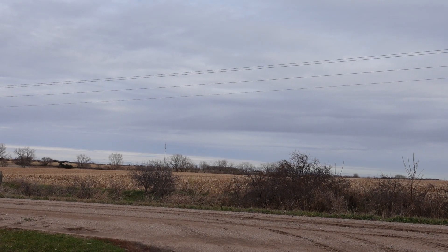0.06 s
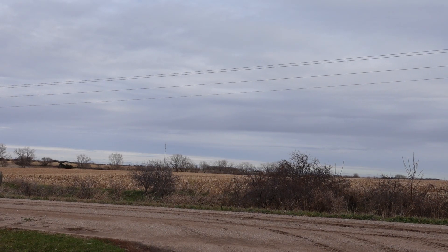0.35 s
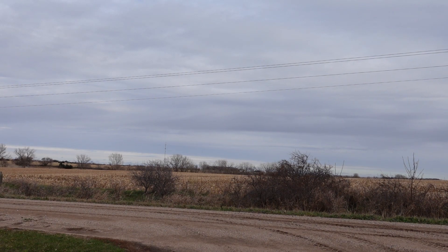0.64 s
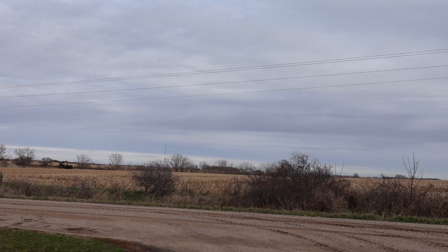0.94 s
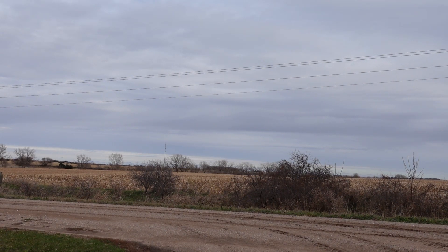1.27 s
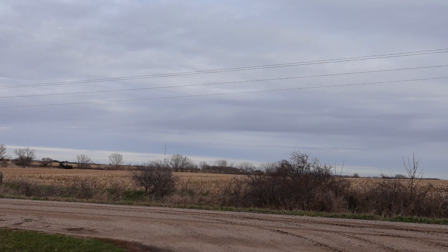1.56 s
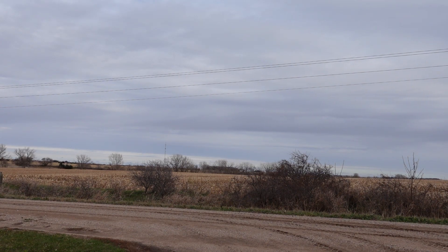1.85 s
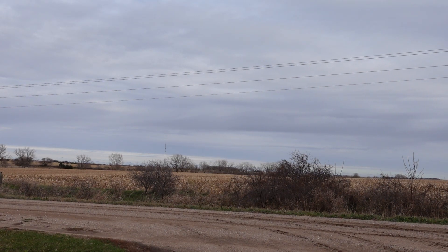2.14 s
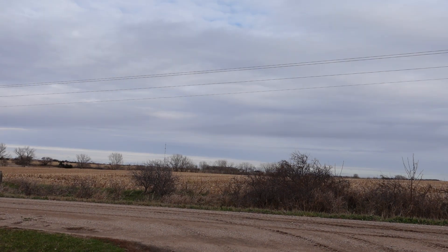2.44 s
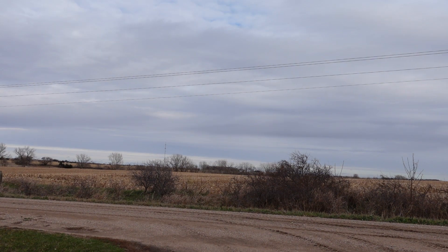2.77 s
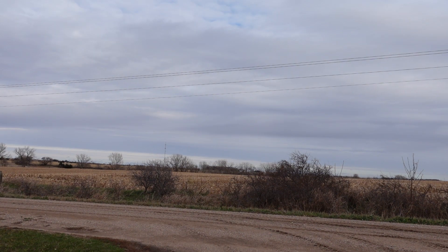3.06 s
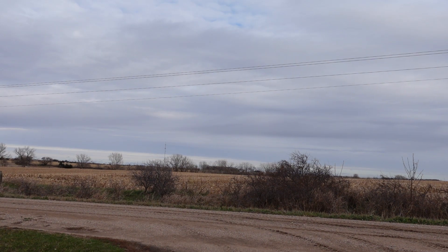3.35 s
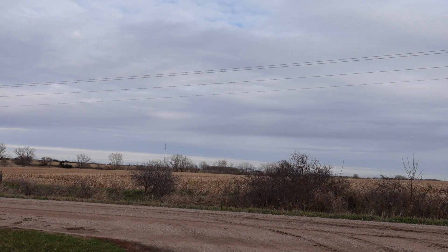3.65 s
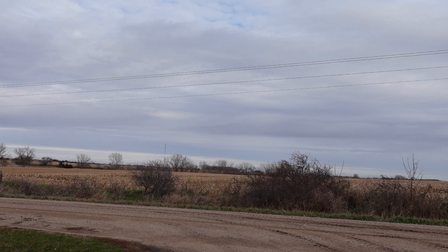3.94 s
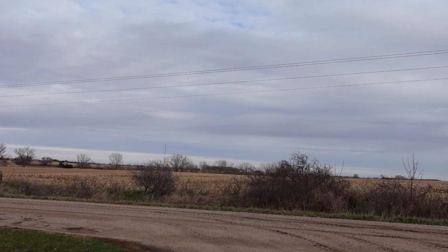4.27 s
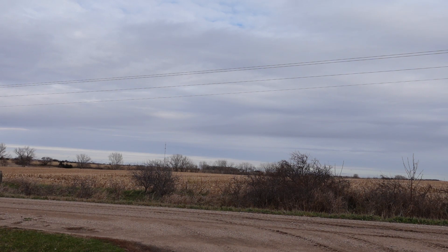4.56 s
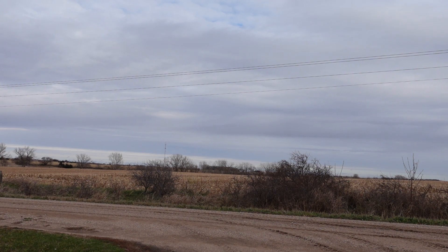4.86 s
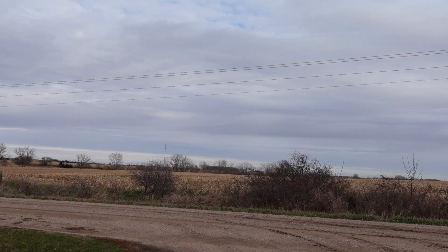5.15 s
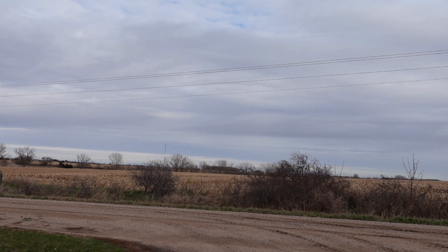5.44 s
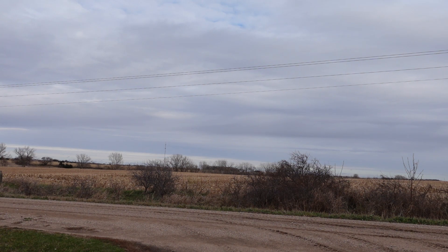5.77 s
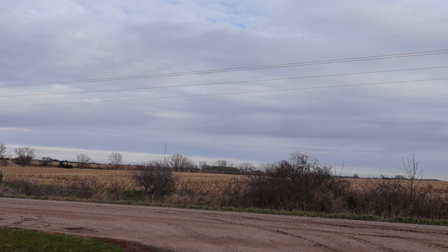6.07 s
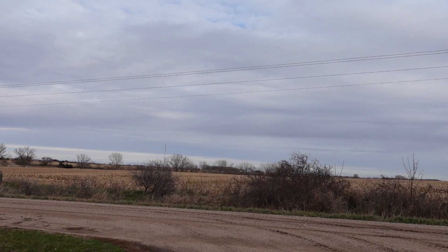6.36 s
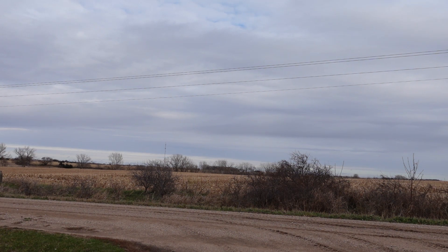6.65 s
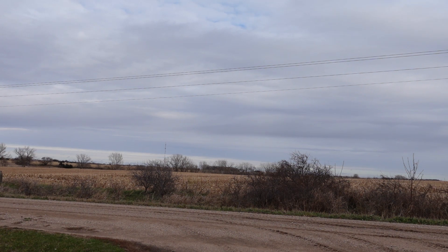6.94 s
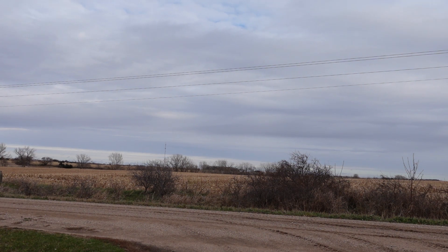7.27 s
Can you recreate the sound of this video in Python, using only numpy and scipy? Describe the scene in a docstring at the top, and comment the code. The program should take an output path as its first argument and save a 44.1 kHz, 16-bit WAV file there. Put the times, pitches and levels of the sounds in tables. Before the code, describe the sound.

A turbo-diesel truck's harsh, chopping exhaust recedes on the right, then suddenly drones far off on the left and grows nearer.

```python
"""A hard, chopping diesel rasp, close on the right: a straight-piped six-cylinder turbo truck pulls away
on a gravel road in open fields, shifts up and lifts off. Then, abruptly, it is a far drone coming
nearer, shifting up once more. Each firing gives a low pipe pulse and a rasping puff of gas;
an echo off the road sweeps through the rasp. Faint hiss lies underneath."""
import sys
import numpy as np
from scipy import signal
from scipy.fft import rfft, irfft
from scipy.io import wavfile
from scipy.ndimage import uniform_filter1d, minimum_filter1d

SR = 44100
rng = np.random.default_rng(int(sys.argv[2]) if len(sys.argv) > 2 else 0)


def unload_wav(signal):
    """Save mono or channel-first audio to the path in sys.argv[1] as 16-bit WAV at rate SR, clipped to [-1, 1]."""
    wavfile.write(
        sys.argv[1],
        SR,
        np.round(np.clip(np.atleast_2d(signal).T, -1, 1) * 32767).astype(np.int16),
    )


N = 331191
TIME = np.arange(N) / SR
WINDOW = dict(nperseg=1024, noverlap=768)
BIN_HZ, FRAME_S, _ = signal.stft(TIME, SR, **WINDOW)

# Leaving, the revs sink into the higher gear. Each row: time in seconds, crank turns a second.
AWAY_REVS = [(0, 32.7), (.31, 32.9), (.6, 30.5), (.84, 28.5), (1.02, 25.6), (1.3, 25.85), (2.18, 26.2),
             (2.33, 24), (2.42, 23)]


def truck_away():
    """Close by, tailpipe toward the listener: a hard, chopping rasp over the drone and the pipe's ring."""
    # Pipe overtones. Each row: multiple of the crank speed, then relative dB at each stage.
    orders = [(4, -10, -24, -21), (5, -30, -12, -17.5), (7, -9.5, -11.5, -18.5), (8, -4.5, -17.5, -14),
              (9, -5, -9, -2.5), (10, -2.5, -11, -14.5), (11, -16, -7.5, -13), (12, -24, -7, -14.5),
              (13, -13.5, -10.5, -9), (14, -32, -19, -19.5), (15, -39, -31, -18.5), (16, -28, -16, -14),
              (18, -36, -34, -23)]
    stages_s = (0.25, 0.92, 1.13)  # pulling, shifting, in the higher gear
    # Tone of the rasp. Each row: frequency in Hz, relative level in dB.
    colour = [(80, -57), (300, -22), (520, -14), (750, -8.5), (1100, -3.5), (1450, 1), (2100, -3),
              (3000, -9.5), (4000, -11.5), (5200, -18), (6500, -24.5), (8500, -30.5), (9700, -41.5),
              (13000, -70.5)]
    # Bounce off the road. Each row: time in seconds, delay in ms, signed strength.
    echo = [(0, 0.52, .07), (.75, .55, 0.14), (1.5, 0.48, 0.27), (2.43, 0.32, .2)]
    # Gliding bands of rasp swell or sink. Each row: peak time and half length in seconds,
    # centre in Hz, glide in octaves a second, relative lift in dB.
    sweeps = [(0.09, 0.29, 1350, .4, 1), (0.096, .5, 2790, 0.064, -6), (0.097, 0.35, 800, 0, 3),
              (.65, 0.2, 1920, .3, 2.5), (1.15, .38, 3060, 0.27, -8.5), (1.446, 0.26, 2472, 0.0095, 3.5),
              (1.6, 0.58, 700, 0.12, -2.5), (1.9, 0.42, 4100, .3, -0.5)]
    # Stereo image. Each row: frequency in Hz, left minus right in dB, left lead in radians, coherence.
    image = [(100, 0, 0, 1), (200, -1, 0, 1), (320, -2.5, 0, .995), (560, -7.5, .05, .88),
             (1200, -12, .7, .88), (2100, -12.5, 0, .91), (3100, -12, -1.2, .9), (4600, -10, -1.9, .89),
             (7000, -9, -2.5, .86), (8600, -9, -1.6, .85)]
    turns = crank(AWAY_REVS, jitter_turns=0.0057)
    low = drone(turns, away_levels, orders, stages_s, waver_db=1.2, rumble_db=-8.5)
    gas = puffs(turns, depth_db=8.0, uneven_db=2.0)
    high = rasp(gas, away_levels, colour, echo, sweeps, image, shimmer_db=1.56)
    return pan_low(low + pipe_ring(away_levels), image) + high


def truck_toward():
    """Far off and nearing: the drone carries, and the rasp grows out of it."""
    # The revs climb, drop at the shift and climb again. Each row: time in seconds, turns a second.
    revs = [(2.44, 29.44), (2.85, 32), (3.3, 34.36), (3.41, 35.35), (3.7, 30.34), (4.4, 30.95), (7.5, 34.8)]
    # Overtones, rasp tone, road bounce, gliding bands and stereo image; columns as in truck_away.
    orders = [(4, -14, -10, -11, -8.5), (5, -12, -17, -18, -15), (7, -20, -6, -7, -7),
              (8, -10, -8.5, -12.5, -3.5), (9, -4, -18, -5.5, -10), (10, -15.5, -10, -20, -19.5),
              (11, -20.5, -18.5, -12.5, -18), (12, -26, -17, -13.5, -29), (13, -18.5, -27, -14, -16),
              (14, -23, -18, -24, -17), (15, -28, -21, -25, -36), (16, -27, -20.5, -25.5, -29)]
    colour = [(80, -34), (300, -17), (520, -8.5), (750, -1.5), (1000, -0.5), (1350, 0.5), (1900, -1),
              (2800, 2.5), (3900, 3.5), (4700, -4.5), (5500, -15.5), (6500, -28), (8000, -44), (10000, -63)]
    echo = [(2.43, 0.83, -0.023), (4.1, 0.87, -0.21), (4.6, 0.61, -0.23), (5.1, 0.6, -0.33),
            (5.5, 0.46, -0.18), (6.0, 0.4, -0.33), (6.4, 0.37, 0.13)]
    sweeps = [(2.85, .22, 4850, -.2, 6), (3.15, 0.37, 2600, -0.16, 8.5), (3.3, 0.36, 1190, -.3, 8.5),
              (3.5, 0.37, 4240, -.15, -8.5), (3.9, .25, 3400, 0.9, 7.5), (4.55, 0.55, 870, .12, 6.5),
              (4.6, .5, 4850, 0.09, 13), (5.0, 0.27, 3483, 0.7, -5), (5.5, 0.39, 3300, 0.3, 5.5),
              (5.9, 0.6, 1360, 0.1, 4), (6.8, .7, 920, 0, -6), (7.1, .7, 1709, 0.3, 3.5)]
    image = [(170, 0, 0, 1), (320, 1, 0, .995), (560, 4.5, -.1, .88), (1000, 8, -.15, .92),
             (2200, 8.3, -.08, .97), (4500, 6.8, -.15, .97), (7000, 4.5, -.2, .75)]
    stages_s = (3.348, 3.878, 5.9, 7)  # revving, in the higher gear, nearing, near
    turns = crank(revs, jitter_turns=0.0023)
    low = drone(turns, toward_levels, orders, stages_s, waver_db=2.0, rumble_db=-8)
    gas = puffs(turns, depth_db=7.5, uneven_db=0.0)
    high = rasp(gas, toward_levels, colour, echo, sweeps, image, shimmer_db=1.0)
    return pan_low(low, image) + high


def away_levels(t):
    """Layer levels in dB: the truck recedes, booms, surges and drops away as the driver lifts off."""
    # Layers: firing note, octave, overtones, rasp, bright edge, fizz. Each row: opening dB, fade in dB
    # a second, share of the surges, lift-off start and length in seconds, lift-off drop in dB.
    layers = [(-35, -0.5, 0, 2.2, .13, 13), (-32, 1, 0, 2.18, 0.22, 10.5),
              (-28.5, 1.47, 0, 2.203, 0.09, 12.4), (-20, 4.5, 0.45, 2.147, 0.21, 13.8),
              (-31, 1.15, 1.2, 2.107, 0.29, 18), (-37.5, 8, 1.3, 2.18, 0.18, 7.9)]
    # Surges and lulls of the rasp. Each row: peak time and half length in seconds, dB at full share.
    surges = [(.27, .06, 1.0), (.55, 0.097, 2.5), (.92, 0.031, 2), (1.13, 0.12, -1.5), (1.32, .06, 1),
              (1.48, .06, -2.2), (1.67, 0.047, -4), (1.79, 0.092, 3), (2.08, 0.051, 4)]
    surge_db = swells(surges, t)
    note, octave, *rest = [db - fade * t + share * surge_db - drop * np.clip((t - off_s) / length, 0, 1)
                           for db, fade, share, off_s, length, drop in layers]
    note_hz = 3 * follow(AWAY_REVS, t)[0]
    boom_db = 8 * bell(note_hz, centre=86.2, width=5.9)  # the note sinks through a pipe resonance
    off_resonance_db = 11 * (1 - bell(2 * note_hz, centre=152.3, width=23))  # the octave has its own
    return [note + boom_db, octave - off_resonance_db, *rest]


def toward_levels(t):
    """Layer levels in dB: they grow as the truck nears and dip as the throttle closes for the shift."""
    # Drone loudness. Each row: time in seconds, then firing note, octave and overtones in dB.
    drone_levels = [(2.44, -46.5, -42, -45.5), (3.2, -41, -38, -45), (3.56, -38.5, -39.5, -43.5),
                    (3.7, -42.5, -46.5, -42.5), (4.6, -39.5, -43.5, -44.5), (6.15, -36, -39, -41),
                    (6.95, -41, -47, -42.5), (7.5, -40, -47, -44)]
    # Rasp loudness. Each row: time in seconds, then rasp, bright edge and fizz in dB.
    rasp_levels = [(2.44, -58.5, -63, -81), (3.3, -52.5, -54.5, -75.5), (3.9, -52.5, -49.5, -75),
                   (4.75, -49, -52, -66.5), (6.1, -42, -43, -67.5), (6.4, -41.5, -39.5, -60.5),
                   (6.7, -41, -37, -49.5), (6.97, -41, -37.5, -56.5), (7.5, -41, -39, -58)]
    # Dip at the shift in dB, one for each of those six layers.
    dips_db = [6.5, 9, 1.5, 1.9, 4.4, 6]
    # The far note swells and fades. Each row: peak time and half length in seconds, lift in dB.
    note_swells = [(2.55, .05, 3), (2.78, .05, 3.5), (2.9, .05, -5), (4.05, 0.14, 4), (5.9, .15, -2),
                   (7.2, 0.11, -2.5)]
    shifting = bell(t, centre=3.425, width=0.069)
    layers = follow(drone_levels, t) + follow(rasp_levels, t)
    note, *rest = [db - dip * shifting for db, dip in zip(layers, dips_db)]
    return [note + swells(note_swells, t), *rest]


def crank(revs, jitter_turns):
    """Running count of crankshaft turns, slightly unsteady."""
    return np.cumsum(follow(revs, TIME)[0]) / SR + jitter_turns * wander(rate_hz=44) + 1


def puffs(turns, depth_db, uneven_db):
    """Two streams of gas noise burst at each firing, each cylinder with its own strength."""
    # Extra punch of the six cylinders in dB, in firing order.
    cylinders_db = [-1.4, 0.95, 0.36, -1.6, 0.66, 0.019]
    firings = 3 * turns + .25
    burst = np.interp(firings % 1, [0, .15, .35, 1], [0.12, 1, 0.95, 0.051])  # snap, hold, slower fall
    strength_db = np.resize(cylinders_db, 1024) + uneven_db * rng.uniform(-1, 1, 1024)
    chop = gain_of(burst * (depth_db + strength_db[firings.astype(int)]))
    return unit_rms(chop * rng.standard_normal((2, N)))


def rasp(gas, levels, colour, echo, sweeps, image, shimmer_db):
    """The puffs take the tailpipe's colour, the road's echo and the shimmer of moving air."""
    hz = BIN_HZ[:, None]
    delay_ms, strength = follow(echo, FRAME_S)
    road_comb = abs(1 + strength * np.exp(-2j * np.pi * hz * delay_ms / 1000))
    shape = gain_of(spectrum_at(colour, hz)[0]) * road_comb
    for peak_s, half_s, middle_hz, glide, lift_db in sweeps:
        centre_hz = middle_hz * 2 ** (glide * (FRAME_S - peak_s))
        band = bell(hz, centre_hz, 100 + 0.083 * centre_hz)
        shape *= gain_of(lift_db * bell(FRAME_S, peak_s, half_s) * band)
    shape = ride_bands(shape, levels(FRAME_S)[-3:])
    shape *= gain_of(shimmer_db * patches(shape.shape, bins=16, frames=14))
    shape *= gain_of(1.5 * patches(shape.shape, bins=3, frames=40))  # fine ripple of scattered paths
    return spread_gas(gas, shape, image)


def ride_bands(shape, levels_db):
    """Brings rasp, bright edge and fizz to the levels that load and distance set."""
    bands_hz, centres_hz = [(600, 2400), (2400, 5000), (5000, 9000)], [1600, 3500, 5400]
    shares = [np.interp(np.log(BIN_HZ[:, None] + 1), np.log(centres_hz), row) for row in np.eye(3)]
    for _ in range(2):  # the lifts overlap, so a second pass settles them
        powers = [np.sum(shape[(BIN_HZ >= lo) & (BIN_HZ < hi)] ** 2, axis=0) / len(BIN_HZ)
                  for lo, hi in bands_hz]
        lifts_db = [db - 10 * np.log10(power) for db, power in zip(levels_db, powers)]
        shape = shape * gain_of(sum(share * lift for share, lift in zip(shares, lifts_db)))
    return shape


def spread_gas(gas, shape, image):
    """Filters the gas by a moving spectral shape and spreads it, partly coherent, to left and right."""
    right, loose = signal.stft(gas, SR, **WINDOW)[2]
    balance_db, lead, coherence = spectrum_at(image, BIN_HZ[:, None])
    coherence, tilt = np.clip(coherence, 0, 1), gain_of(balance_db)
    left = tilt * np.exp(1j * lead) * (coherence * right + np.sqrt(1 - coherence ** 2) * loose)
    mid_gain = np.sqrt(1 + tilt ** 2 + 2 * tilt * coherence * np.cos(lead)) / 2
    return signal.istft(np.array([left, right]) * shape / mid_gain, SR, **WINDOW)[1][:, :N]


def drone(turns, levels, orders, stages_s, waver_db, rumble_db):
    """Three firings a turn make the note and its octave; unequal cylinders fill in the other orders."""
    # Gas rumble between the overtones, with the pipe's boom. Each row: frequency in Hz, relative dB.
    rumble_colour = [(20, -25.5), (45, -16.5), (65, -4.5), (105, -3), (126, -7.5), (136, 9.5), (148, 0),
                     (180, 1.5), (260, 4), (400, -7), (600, -11.5), (1000, -60.5)]
    note_db, octave_db, overtone_db, *_ = levels(TIME)
    overtones = np.zeros(N)
    for order, *stage_db in orders:
        # multiples of the firing rate line up into one pulse, the others fall anywhere
        lag = rng.random() * (order % 3 > 0)
        strength_db = np.interp(TIME, stages_s, stage_db) + waver_db * wander(rate_hz=5)
        overtones -= gain_of(strength_db) * np.cos(2 * np.pi * (order * turns + lag))
    note_db += .7 * wander(rate_hz=11)  # moving air
    octave_db += 1.2 * wander(rate_hz=9)
    firing_phase = 6 * np.pi * turns
    note = -gain_of(note_db) * np.cos(firing_phase) - gain_of(octave_db) * np.sin(2 * firing_phase)
    throb = gain_of(.5 * wander(rate_hz=27))  # combustion varies from cycle to cycle
    rumble = gain_of(rumble_db) * noise(rumble_colour)
    return throb * (np.sqrt(2) * note + gain_of(overtone_db) * (np.sqrt(2) * overtones + rumble))


def pipe_ring(levels, pitch_hz=136.3, below_octave_db=6):
    """The pipe rings at its own pitch whatever the engine speed, and beats against the octave."""
    _, octave_db, *_ = levels(TIME)
    cycles = pitch_hz * TIME + 0.24 * wander(rate_hz=8)
    ring_db = octave_db - below_octave_db + 2.1 * wander(rate_hz=6.7)
    return np.sqrt(2) * gain_of(ring_db) * np.sin(2 * np.pi * cycles)


def pan_low(x, image):
    """Low sound reaches both sides in step, a little louder on the near one."""
    tilt = gain_of(spectrum_at(image, np.fft.rfftfreq(N, 1 / SR))[0])
    return irfft(rfft(x) * 2 * np.array([tilt, np.ones_like(tilt)]) / (1 + tilt), N)


def hiss(level_db=-76.5):
    """Faint, soft microphone hiss, mostly in the centre."""
    # Tone of the hiss. Each row: frequency in Hz, relative level in dB.
    colour = [(100, 0), (1000, -2), (6000, -7), (10000, -9.5), (15500, -10)]
    return gain_of(level_db) * (noise(colour) + 0.31 * np.array([noise(colour), noise(colour)]))


def gain_of(db):
    """Decibels to gain."""
    return 10 ** (np.asarray(db) / 20)


def unit_rms(x):
    """Scales to rms 1."""
    return x / np.sqrt(np.mean(x ** 2) + 1e-20)


def follow(rows, t):
    """The columns of a curve table at times t."""
    seconds, *columns = np.transpose(rows)
    return [np.interp(t, seconds, c) for c in columns]


def spectrum_at(rows, hz):
    """The columns of a spectrum table at hz, joined on a log-frequency axis."""
    row_hz, *columns = np.transpose(rows)
    return [np.interp(np.log(hz + 1), np.log(row_hz + 1), c) for c in columns]


def noise(colour):
    """Steady noise of a given colour, rms 1."""
    colour_db, = spectrum_at(colour, np.fft.rfftfreq(N, 1 / SR))
    return unit_rms(irfft(rfft(rng.standard_normal(N)) * gain_of(colour_db), N))


def wander(rate_hz):
    """Random drift, rms 1."""
    knots = rng.standard_normal(2048)
    return unit_rms(np.interp(TIME * rate_hz, np.arange(len(knots)), knots))


def patches(shape, bins, frames):
    """Random patches over frequency and time, rms 1."""
    field = uniform_filter1d(rng.standard_normal(shape), size=bins, axis=0)
    return unit_rms(uniform_filter1d(field, size=frames, axis=1))


def bell(x, centre, width):
    """A smooth hump of height 1."""
    return np.exp(-((x - centre) / width) ** 2)


def swells(rows, t):
    """Sum of short swells and lulls, in dB."""
    return sum(db * bell(t, peak_s, half_s) for peak_s, half_s, db in rows)


def scene():
    """The truck leaving, then all at once the truck approaching, over faint hiss."""
    switch_s, crossfade_s = 2.431, .012
    approaching = np.clip((TIME - switch_s) / crossfade_s + .5, 0, 1)
    return hiss() + (1 - approaching) * truck_away() + approaching * truck_toward()


def record(dry):
    """A quick limiter holds the highest peaks down; a steep low-pass trims the very top."""
    ceiling, top_hz = .72, 15700
    peak_gain = np.minimum(1, ceiling / (abs(dry).max(axis=0) + 1e-9))
    held = dry * uniform_filter1d(minimum_filter1d(peak_gain, size=121), size=121)
    lowpass = signal.firwin(511, top_hz, window=("kaiser", 9), fs=SR)
    return signal.oaconvolve(held, lowpass[None], "same")


dry = scene()
out = record(dry)
unload_wav(out)
```